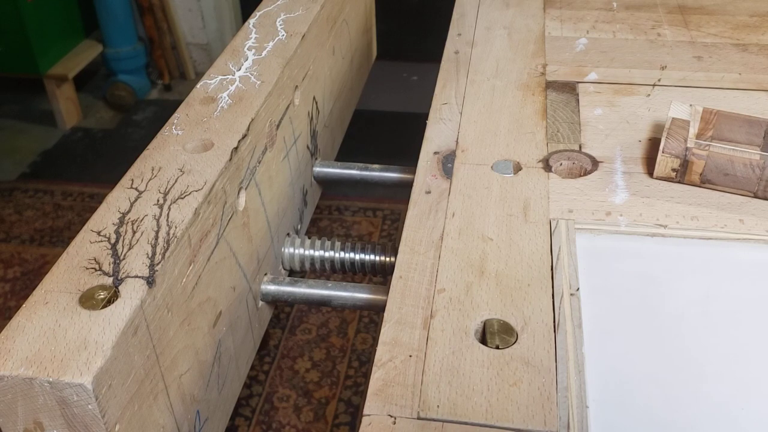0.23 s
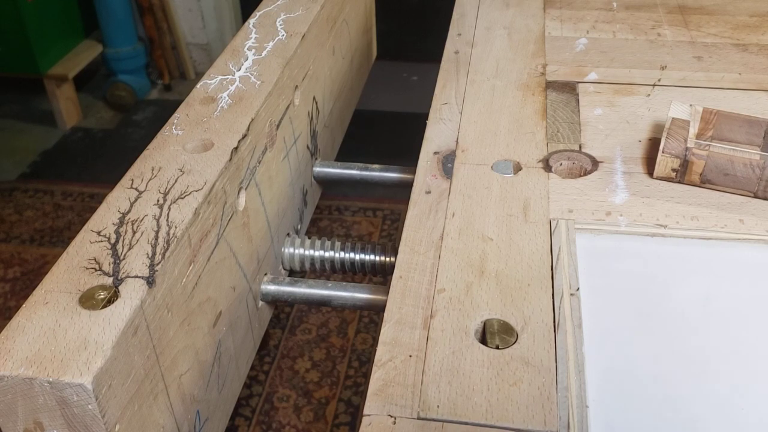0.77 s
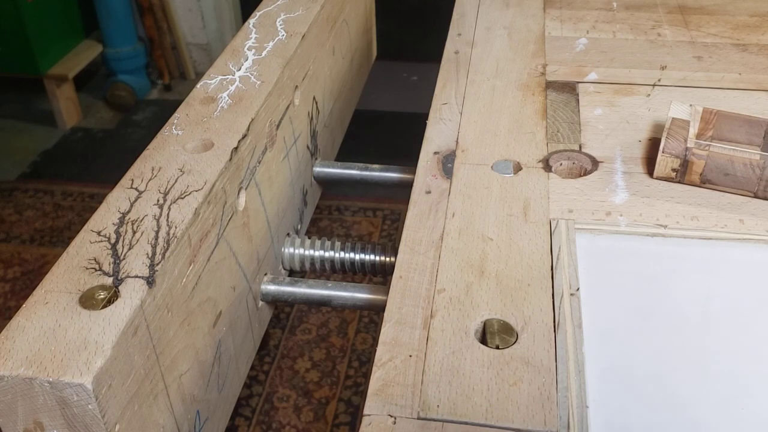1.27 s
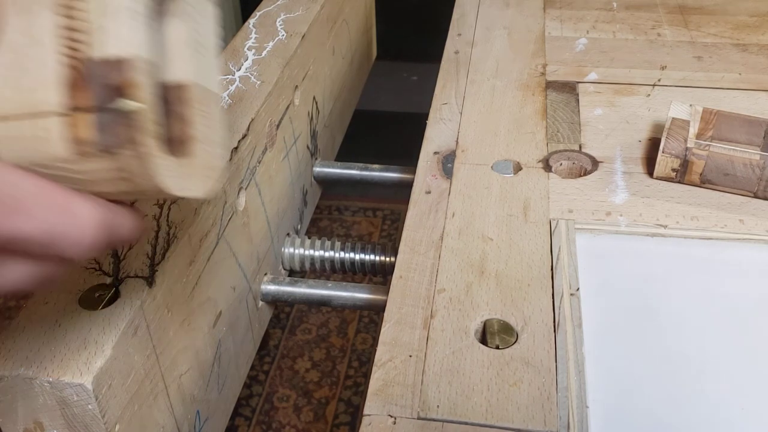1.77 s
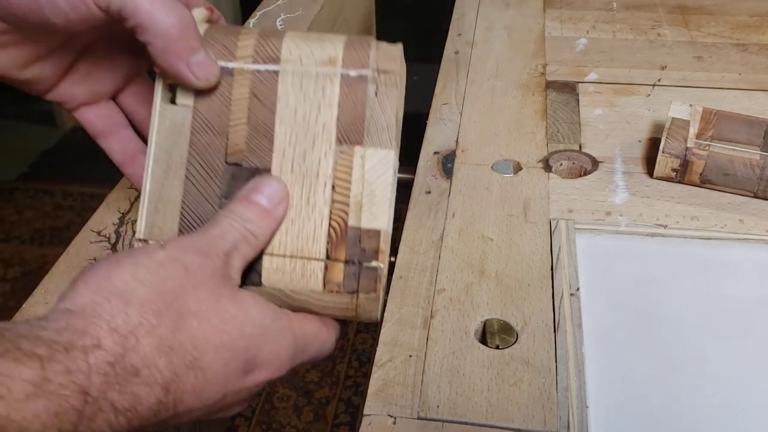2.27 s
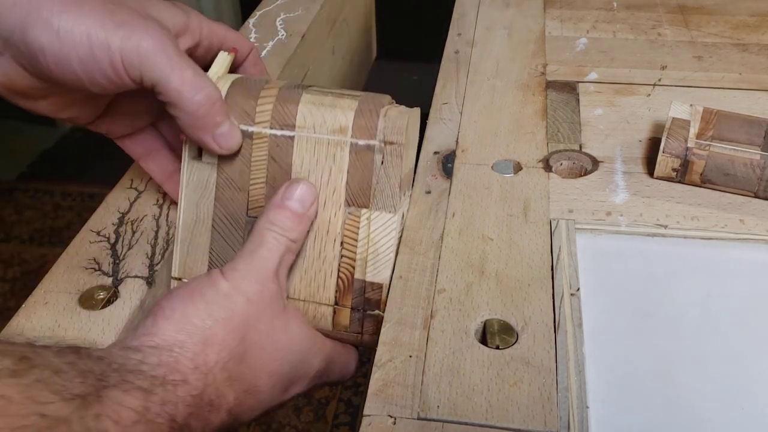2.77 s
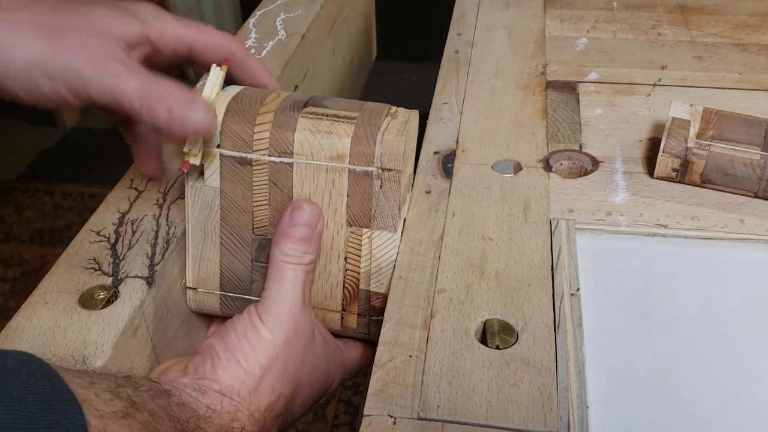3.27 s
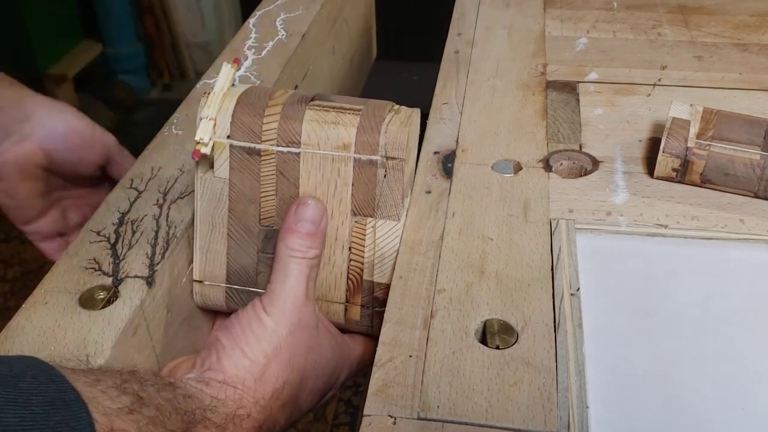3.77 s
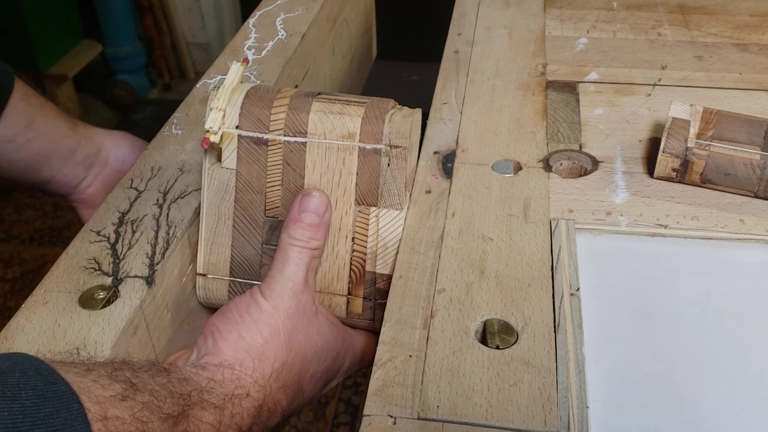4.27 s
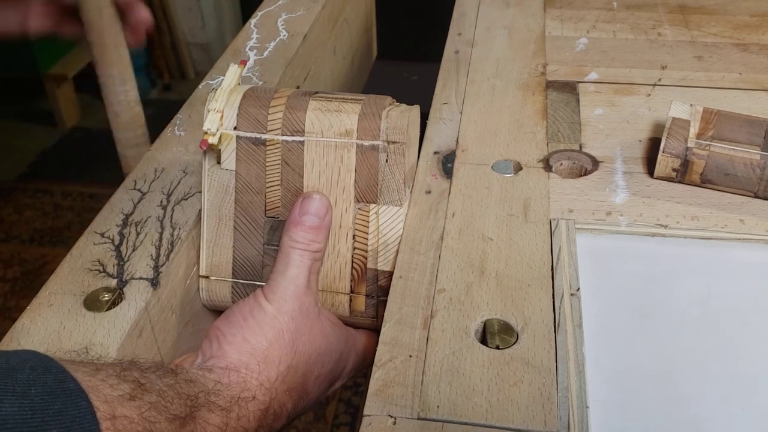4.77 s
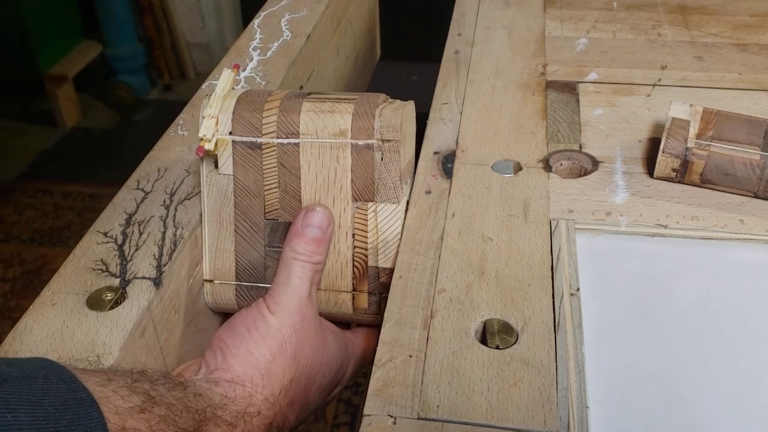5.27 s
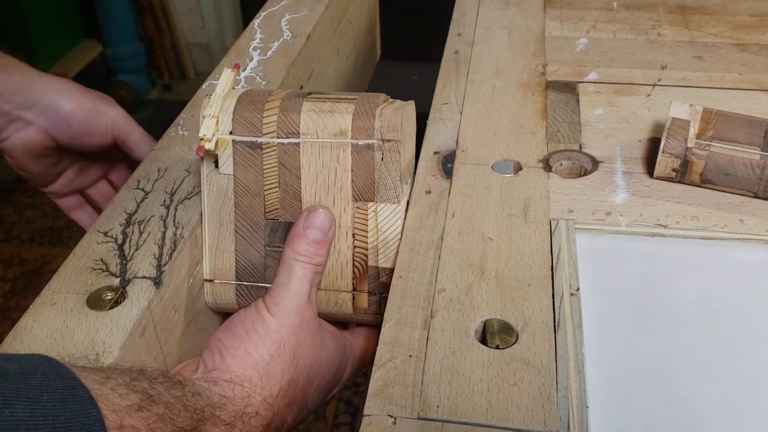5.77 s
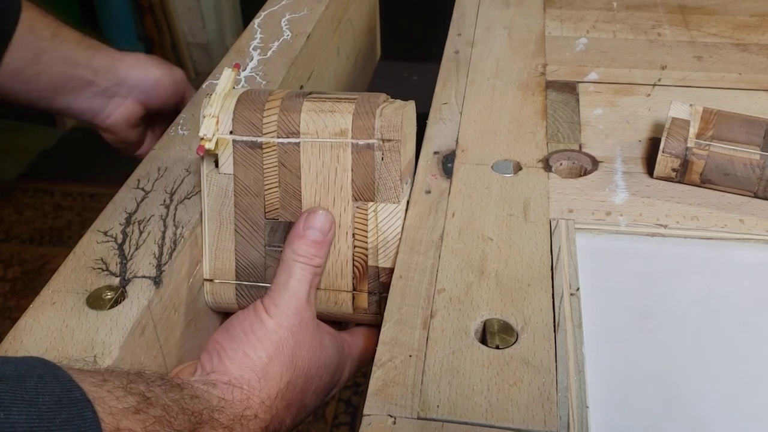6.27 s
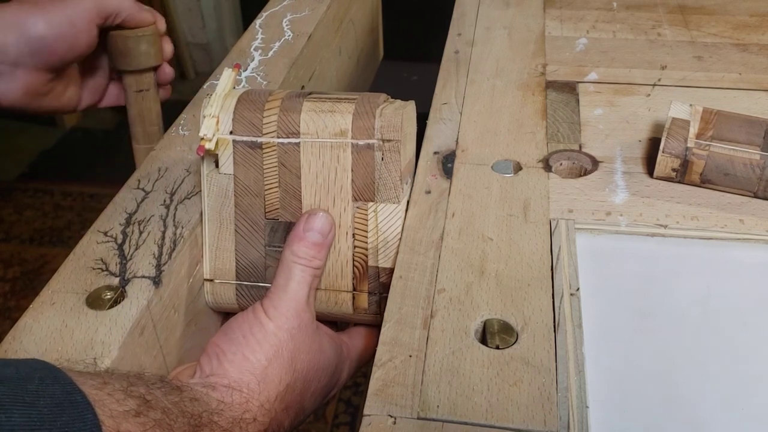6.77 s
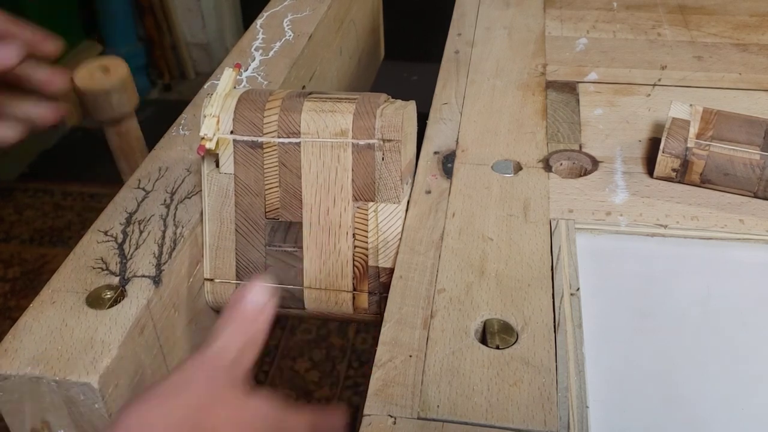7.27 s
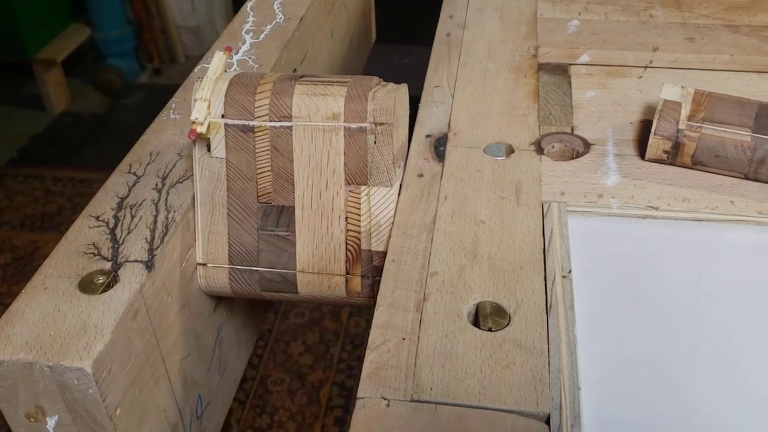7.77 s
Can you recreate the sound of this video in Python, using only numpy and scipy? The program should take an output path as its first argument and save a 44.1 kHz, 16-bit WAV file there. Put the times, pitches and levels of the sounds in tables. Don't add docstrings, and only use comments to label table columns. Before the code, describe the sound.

Quiet humming workshop: soft sliding wood, dull clustered knocks and rumbling grinding as a vice is wound shut, ending with its handle dropping sharply.

```python
import sys
import numpy as np
from scipy import signal
from scipy.fft import rfft, irfft
from scipy.io import wavfile
from scipy.ndimage import uniform_filter1d

SR = 44100
rng = np.random.default_rng(int(sys.argv[2]) if len(sys.argv) > 2 else 0)


def materialize(psi):
    bounded = np.clip(np.atleast_2d(psi).T, -1, 1)
    quanta = np.round(bounded * 32767).astype(np.int16)
    wavfile.write(sys.argv[1], SR, quanta)


def natural_amplitude(level_db):
    exponent = np.asarray(level_db, float) / 20
    return 10 ** exponent


N = 353682

# frequency in Hz, density in dB per Hz.
AIR_SPECTRUM = [(45, -8), (65, -3), (95, -11), (150, -13), (250, -13), (310, -20), (500, -32.5), (900, -35),
                (2000, -47), (5200, -53.5), (6800, -63), (8200, -66), (10000, -56.5), (14000, -49.5)]
AIR_DB = -48.5
# frequency in Hz, likeness from 0 to 1.
AIR_LIKENESS = [(60, 0.96), (180, 0.71), (550, 0.24), (1650, 0.025), (4970, 0.01), (15000, 0.18)]
# frequency in Hz, balance in dB.
AIR_BALANCE = [(60, -9.5), (180, 3.5), (550, -9.5), (1650, 0), (4970, -3.5), (15000, 0.5)]
# time in seconds, level in dB.
AIR_DRIFT = [(0, 3), (1.299, 3), (2, 0.5), (3.302, 0.5), (3.9, 4), (5, 1), (5.6, -2.5), (7.002, -3),
             (8.02, -5.5)]
# frequency in Hz, level in dB, waver in Hz, loose share from 0 to 1, #
# left-right balance in dB, left lead in radians.
HUM_TONES = [
    (119.5, -44.5, 14, 0.22, -1, 0.087),
    (76.2, -44, 4.7, 0.43, 1.5, 0.13),
    (251.6, -60, 2.5, 0.7, 5, 0.11),
    (63.3, -50.5, 3.8, 0.93, 0.5, 0.11),
]

# time in seconds, hold in seconds, edge in seconds, swish in dB, sheen in dB.
CLOTH_MOVES = [(-0.011, 0.039, 0.013, -53, -57), (0.094, 0.045, .15, -64.5, -77),
               (0.315, 0.031, 0.24, -63, -72.5), (0.531, 0.031, 0.12, -66.5, -69.5),
               (0.625, .002, 0.018, -48.5, -54), (0.656, 0.057, 0.039, -67, -75),
               (0.854, 0.0046, 0.089, -64, -91), (0.962, 0.0037, 0.081, -54.5, -70),
               (1.049, 0.087, 0.14, -63.5, -76), (1.238, 0.089, 0.055, -59.5, -68)]
# centre in Hz, width in Hz, level in dB.
CLOTH_SWISH = [(1930, 290, 4), (2800, 940, 4), (3700, 1400, 2.5), (4780, 850, -1), (6000, 710, -5)]
CLOTH_SHEEN = [(9400, 2300, -1.4), (12550, 3900, 0.047), (13300, 4300, -0.76)]
# start in seconds,
# length in seconds, level in dB, frequency in Hz, second frequency in Hz.
SCUFFS = [(0.286, 0.098, -73, 1360, 5400), (0.622, 0.02, -56.5, 2730, 4900),
          (0.61, 0.022, -58.5, 1880, 2300), (0.77, 0.16, -71.5, 1940, 2850), (.92, 0.096, -74, 4570, 4600),
          (0.936, 0.073, -64, 2500, 1950), (1.035, 0.077, -65, 1900, 1500), (1.05, .08, -67.5, 2790, 4300),
          (1.227, 0.045, -78, 4350, 5000), (1.295, 0.057, -67, 2850, 7300), (.002, 0.042, -73, 4150, 2460),
          (0.256, 0.15, -79, 5570, 6850), (0.498, .11, -80.5, 4950, 5400), (2.51, .12, -81, 5230, 4530),
          (3.22, 0.068, -79, 5400, 4200), (3.25, .07, -79, 6500, 3350), (6.335, 0.075, -63, 2705, 2480),
          (2.825, 0.13, -67.5, 1700, 2850), (3.284, 0.068, -65, 2320, 5170), (6.341, .1, -58, 1290, 4900),
          (7.049, 0.2, -80, 4600, 5420), (4.77, 0.15, -77, 6670, 5400), (2.448, .07, -73, 1380, 5130),
          (2.539, .06, -70.5, 1430, 5400), (2.655, 0.06, -67.5, 1400, 3400),
          (2.85, 0.088, -64.5, 2850, 4440), (6.255, 0.063, -63.5, 3830, 2570),
          (6.335, 0.085, -70, 4850, 3900),
          (6.705, 0.092, -57, 632, 860), (8.3, 0.065, -70.5, 1700, 1110), (7.363, .045, -66.5, 2400, 4500),
          (4.76, 0.21, -79, 4250, 4900), (8.5, 0.098, -78, 5240, 4100)]
# start in seconds, level in
# dB, centre in Hz, left-right in dB.
TICKS = [(0.622, -36.5, 13500, 8), (0.66, -36.5, 6540, 9), (1.134, -46, 10800, 5), (5.4548, -48, 7400, 21),
         (5.5756, -47, 11500, -18), (5.676, -46, 11800, -3), (7.453, -2.5, 5620, -6)]
# top in seconds, rise in seconds, hold in seconds, level in dB.
SLIDES = [(2.303, 0.07, .005, -64), (2.561, 0.15, 0.1, -51.5), (2.763, 0.016, .003, -45.5),
          (2.793, 0.018, 0.16, -54), (3.031, 0.062, 0.059, -58.5), (3.216, 0.1, 0.04, -60.5),
          (3.307, 0.046, 0.0064, -53.5)]
# centre in Hz, width in Hz, level in dB.
HOLLOW = [(1430, 160, 6), (1700, 120, -12), (2320, 380, 0), (2850, 190, 0.5), (3400, 140, 1),
          (4640, 670, 3), (5400, 56, -9.5), (10500, 2500, -9.5)]
# top in seconds, rise in seconds, hold in seconds, level in dB.
PALM_GLIDES = [(4.774, 0.16, 0.11, -61), (3.9, .04, .03, -75), (4.16, .01, 0.0092, -76),
               (6.13, .04, 0.022, -70), (6.203, 0.12, 0.21, -83), (7.103, 0.2, .005, -71.5),
               (7.22, 0.12, 0.0035, -75)]
# centre in Hz, width in Hz, level in dB.
SKIN = [(4690, 1100, -9), (6850, 610, -1), (9960, 1000, -0.5), (11500, 1500, -3.5), (13050, 2600, 8),
        (14840, 3000, 7.5)]
# frequency in Hz, gain in dB.
FRICTION_TREBLE = [(10000, -1), (12000, 5), (15000, 9)]

# frequency in Hz, level in dB, t60 in seconds.
BENCH = [(50.55, -3, .3), (78.7, -3.5, 0.25), (101.3, -5, .2), (136.3, -1.5, 0.19), (161.7, 0.5, 0.058),
         (212.2, -8, 0.1), (255.3, -2, 0.12), (281, -5, 0.17), (400, 15.5, 0.069), (477, -6.5, 0.17)]
HANDLE = [(520, -2, .09), (650, 0, .1), (731, -2, .08), (865, -1, .09), (960, -2, .07), (1077, -2, .07),
          (1210, -1, .07), (1430, 0, .07), (1663, -1, .06), (1900, -1, .06), (2137, -1, .06),
          (2400, -2, .05), (2700, -1, .05)]
KNOB = [(2950, -4, .03), (3300, -3, .03), (3570, -2, .03), (3844, -1, .035), (4100, -2, .03),
        (4330, 0, .03), (4619, 1, .03), (5087, 0, .03), (5500, -5, .03), (5900, -8, .025),
        (6400, -12, .025), (9500, -20, .01)]
# top in seconds, rise in seconds, hold in seconds, level in dB.
GRINDS = [(2.497, 0.093, .005, -54.5), (2.576, 0.18, 0.025, -53), (4.408, 0.098, 0.0068, -49.5),
          (4.615, 0.028, 0.12, -56.5), (5.041, 0.055, 0.046, -69.5), (6.079, 0.052, 0.027, -55),
          (6.122, 0.028, 0.15, -37.5), (6.246, 0.04, 0.095, -39.5), (6.387, .1, 0.018, -32),
          (6.732, 0.13, 0.066, -55), (7.045, 0.075, 0.05, -58), (7.195, 0.065, 0.088, -69.5),
          (7.373, 0.018, 0.005, -63.5), (7.397, 0.01, .012, -42.5), (7.423, .012, 0.021, -39)]
# top in seconds, hold in seconds, fall in seconds,
# rumble in dB, place on the bench in Hz.
SCREW_PULLS = [(2.493, 0.0024, 0.088, -35.5, 139), (2.56, 0.086, 0.14, -44.5, 157),
               (4.18, 0.017, 0.41, -35, 142), (4.33, 0.12, 0.091, -38, 179),
               (4.448, 0.0053, 0.069, -24, 247), (4.48, 0.022, 0.051, -35.5, 200),
               (4.597, 0.004, 0.03, -35, 176), (4.692, 0.0082, 0.1, -44.5, 195),
               (5.051, 0.076, 0.1, -52.5, 280), (5.327, 0.0033, 0.058, -33, 166),
               (6.157, 0.022, 0.23, -28.5, 93), (6.259, 0.044, 0.088, -27.5, 88.6),
               (6.359, 0.075, 0.17, -28.5, 86.6), (6.714, 0.044, 0.21, -44, 102),
               (7.0, 0.065, 0.057, -46, 125), (7.44, 0.01, 0.027, -43, 120)]
# frequency in Hz, level in dB.
SQUEAL_TONES = [(6525, 6), (8441, 0), (12737, -24)]
# top in seconds, hold in seconds, level in dB.
SQUEAL_CRIES = [(6.227, 0.13, -76.5), (6.494, 0.034, -75.5)]
# start in seconds, frequency in Hz, level in dB, t60 in seconds.
PINGS = [(4.152, 3450, -45, .05), (4.158, 1576, -40, 0.071), (4.158, 2255, -38, .05),
         (4.158, 377, -49, 0.06), (4.417, 1197, -38, 0.049), (4.442, 868, -32, 0.045),
         (4.455, 259.4, -34.5, .15), (4.558, 1120, -32.5, 0.032), (4.557, 4170, -58, 0.043),
         (5.302, 418, -43, 0.064), (5.302, 1263, -54, 0.076), (6.127, 1665, -43, .05),
         (6.208, 702, -35, 0.12), (6.208, 2500, -46, 0.057), (6.208, 3520, -48, .04),
         (6.228, 727, -36, 0.041), (6.408, 2800, -54, 0.026), (7.453, 3980, -16.5, 0.022),
         (7.47, 3700, -31, 0.06), (7.422, 1890, -48.5, .05), (6.213, 1286, -37.5, .06),
         (6.402, 4650, -56, .04), (7.453, 4640, -9, 0.0092), (7.531, 3920, -31.5, 0.032),
         (2.767, 3530, -52.5, 0.02)]
# start in seconds, level in dB.
TAP = (2.769, -36.5)
# frequency in Hz, level in dB, t60 in seconds.
BLOCK = [(1290, -7, 0.042), (1434, 2, 0.079), (1940, -1.5, 0.057), (2890, 0, 0.018), (4300, -8, 0.034)]
# start in seconds, level in dB, centre in Hz, rattle in milliseconds.
CRACKS = [(4.151, -41, 3840, 3.8), (4.161, -37.5, 4070, 9.3), (4.432, -54, 5000, 4.3),
          (4.44, -51.5, 3900, 11), (4.557, -52, 4000, 16), (6.126, -53, 4540, 12), (6.157, -50, 4600, 3.4),
          (6.207, -48, 3400, 8.3), (6.231, -57, 3400, 5), (6.252, -57, 4030, 3.4), (6.298, -53, 3000, 4.5),
          (6.333, -50, 3800, 3.3), (6.411, -63, 4600, 5), (7.391, -56, 4500, 10.6), (7.417, -50, 3570, 11),
          (7.437, -52.5, 4370, 4.4)]
# start in seconds, thud in dB, knock in dB, knock centre in Hz,
# dullness in dB per octave squared.
KNOCKS = [(4.152, -44, -36, 1960, 3), (4.161, -38.5, -34, 1460, -4), (4.416, -42, -36, 900, 7),
          (4.428, -32, -26, 700, 12), (4.44, -34, -22.5, 830, 3), (4.557, -42, -29.5, 1090, 4.5),
          (5.299, -34.5, -36, 995, 8.5), (5.325, -44, -46, 900, 10), (6.126, -37.5, -45, 1450, -5),
          (6.207, -32.5, -22.5, 900, 7), (6.228, -57, -30, 750, 7), (6.333, -48, -34, 1290, 9),
          (6.408, -47, -39, 1400, 14), (7.391, -49, -35, 691, 2.5), (7.418, -37.5, -27.5, 700.5, 7.5),
          (7.652, -37, -56, 608, -1)]
# start in seconds, level in dB, top in Hz, t60 in seconds.
SHUDDERS = [(4.152, -47, 6000, 0.26), (4.438, -43.5, 3070, 0.18), (4.44, -50.5, 5500, 0.27),
            (4.557, -47, 2900, 0.22), (5.299, -52.5, 2560, 0.21), (6.207, -42, 3760, 0.21),
            (7.454, -19, 6010, 0.095), (7.531, -35, 5840, 0.22)]
# start in seconds, wood in dB, dullness in dB per octave squared,
# crack in dB.
DROPS = [
    (7.4542, -6, -0.86, -2),
    (7.531, -19, -2, -28),
]
# frequency in Hz, level in dB, t60 in seconds.
STOP = [(51.6, -21.5, 0.14), (127, -13.5, 0.2), (255.3, -12, 0.19), (379, 1, 0.083), (517, -11.5, 0.076),
        (647.5, -5, 0.22), (732, -16.5, 0.16), (918, -16.5, 0.076), (960, -14.5, 0.077), (1044, -18, 0.071),
        (1460, -9.5, 0.043), (1620, -9.5, 0.033), (2000, -29, 0.13), (2130, 1, 0.032), (2500, -26, 0.04)]
# frequency in Hz, level in dB, t60 in seconds,
# free time in seconds.
BOUNCE_RING = [(379.7, -21, 0.45, 0.04), (186, -31.5, 0.17, 0.046), (300, -37.5, 0.12, .03),
               (77, -35, 0.24, 0.099), (2130, -28, 0.15, 0.048), (697, -31.5, 0.15, 0.05)]

# frequency in Hz, t60 in seconds.
ROOM_T60 = [(100, 0.66), (350, 0.34), (1400, 0.15), (3000, 0.18), (6000, 0.2), (12000, 0.22)]
# frequency in Hz, gain in dB.
MIC = [(30, 4.5), (100, 8.5), (2000, -1.5), (2850, -0.5), (3700, 2), (5000, 2), (6400, 1.5), (7400, -2.5),
       (8600, 0), (10000, 6), (16000, -16)]
# frequency in Hz, balance in dB.
PORTS = [(60, 15.5), (150, -5), (380, 5), (950, -7), (2380, -3), (5980, -5.5), (15000, 14.5)]
AIR_EDGE_HZ = 15780


def evened(x):
    return x / np.sqrt(np.mean(x ** 2) + 1e-20)


def read(points, hz):
    f, value = np.transpose(points)
    return np.interp(np.log(hz + 1), np.log(f + 1), value)


def lean(pan_db):
    return natural_amplitude(np.array([[pan_db / 2], [-pan_db / 2]]))


def add(mix, start_s, sound, pan_db):
    part = mix[:, round(start_s * SR):][:, :len(sound)]
    part += sound[:part.shape[1]] * lean(pan_db)


def resonate(x, hz, width_hz):
    return signal.lfilter(*signal.iirpeak(hz, hz / width_hz, SR), x)


def wander(hz):
    noise = rng.standard_normal(N // 40)
    return evened(signal.lfilter([1], [1, -np.exp(-2 * np.pi * hz / 1000)], noise))


def stroke(top_s, rise_s, hold_s, fall_s, db):
    times = np.array([top_s - rise_s, top_s, top_s + hold_s, top_s + hold_s + fall_s])
    return np.maximum(times, 0), db - 25 * np.array([1, 0, 0, 1])


def rub(s, db, colour, per_s, spread_db):
    t = np.arange(s[0], s[-1], 1 / SR)[:SR // 2]
    force = rng.standard_normal(len(t))
    chance = rng.random(len(t)) * SR / per_s
    rarity = np.clip(-np.log(chance + 1e-12), 0, 4)
    slips = force * (chance < 1) * natural_amplitude(spread_db * rarity)
    tone = 0
    for hz, width, gain_db in colour:
        twice = resonate(resonate(slips, hz, 2 * width), hz, 2 * width)
        tone = tone + natural_amplitude(gain_db) * twice / np.sqrt(width)
    return natural_amplitude(np.interp(t, s, db)) * evened(tone) * signal.windows.tukey(len(t), 0.04)


def near_to(modes, centre_hz, octave_db):
    return [(f, g - octave_db * np.log2(f / centre_hz) ** 2, t60) for f, g, t60 in modes]


def crowd(modes, spread, weaker_db, count=3):
    scatter = rng.uniform(-0.99, 1, (len(modes), count))
    neighbours = [(f * (1 + spread * u), g - weaker_db, 0.5 * t60)
                  for (f, g, t60), row in zip(modes, scatter) for u in row]
    return modes + neighbours


def ring(modes, detune, damping=0.89, soft=0.19):
    hz, db, t60 = np.transpose(modes)
    t = np.arange(min(SR // 6, int(2 * SR * t60.max() / damping)))[:, None] / SR
    hz = hz * (1 + detune * rng.uniform(-0.87, 1, len(hz)))
    decay = natural_amplitude(db - 60 * damping * t / t60)
    tones = decay * np.sin(2 * np.pi * hz * t) * rng.choice([-1, 1], len(hz))
    sound = (tones * (1 - np.exp(-t * hz / soft))).sum(1)
    sound = sound * np.hanning(2 * len(t))[len(t):]
    return sound / abs(sound).max()


def chatter(sound, ms):
    t_ms = np.arange(2048) / SR * 1000
    shape = np.exp(-t_ms / ms) * (1 - np.exp(-9 * t_ms / ms))
    rattle = rng.standard_normal(len(t_ms))
    for _ in range(4):
        power = abs(uniform_filter1d(rattle ** 2, size=64))
        spectrum = rfft(shape * rattle / np.sqrt(power + 1e-30))
        rattle = irfft(spectrum / abs(spectrum))
    sound = signal.oaconvolve(sound, rattle * (t_ms < 8 * ms))
    return sound / abs(sound).max()


def air():
    frames, hz = N // 512 + 5, np.fft.rfftfreq(2048, 1 / SR)
    a, b, c, d, patches = rng.standard_normal((frames, 1025, 5)).T
    patches = evened(uniform_filter1d(uniform_filter1d(patches, 20, 0), 10, 1))
    same = read(AIR_LIKENESS, hz)[:, None]
    left = a + 1j * b
    right = same * left + np.sqrt(1 - same ** 2) * (c + 1j * d)
    s, drift_db = np.transpose(AIR_DRIFT)
    drift_db = np.interp(np.arange(frames) * 512 / SR, s, drift_db - drift_db.mean())
    middle = np.exp(-(np.log2(hz / 1000 + 1e-9) / 1.6) ** 2)[:, None]
    level_db = read(AIR_SPECTRUM, hz)[:, None] + 0.79 * patches + middle * drift_db
    z = np.array([left, right]) * natural_amplitude(level_db) * (hz < AIR_EDGE_HZ)[:, None]
    z *= natural_amplitude(np.array([0.5, -0.5])[:, None, None] * read(AIR_BALANCE, hz)[:, None])
    return natural_amplitude(AIR_DB) * evened(signal.istft(z, nperseg=2048, noverlap=1536)[1][:, :N])


def hum():
    out, t, wander_s = np.zeros((2, N)), np.arange(N) / SR, np.arange(N // 40) / 1000
    for hz, db, waver_hz, loose, pan_db, lead_rad in HUM_TONES:
        swell = np.interp(t, wander_s, wander(waver_hz) + 1j * wander(waver_hz)) / np.sqrt(2)
        swing = (1 - loose) + loose * swell
        tone = swing * np.exp(2j * np.pi * hz * t) * np.exp(1j * np.array([[lead_rad], [0]]))
        out += natural_amplitude(db) * evened(tone.real) * lean(pan_db)
    return out


def cloth():
    out = np.zeros((2, N))
    for top_s, hold_s, edge_s, swish_db, sheen_db in CLOTH_MOVES:
        s, db = stroke(top_s, edge_s, hold_s, edge_s, 0)
        add(out, s[0], rub(s, db + swish_db - 9, CLOTH_SWISH, 3800, 0.9), 0.2)
        add(out, s[0], rub(s, db + sheen_db - 5, CLOTH_SHEEN, 4600, 1.2), 0.2)
    return out


def scuffs():
    out = np.zeros((2, N))
    for start_s, length_s, db, hz, second_hz in SCUFFS:
        s = [start_s, start_s + length_s / 3, start_s + length_s]
        colour = [(hz, 0.05 * hz, 0), (second_hz, 0.018 * second_hz, -9)]
        add(out, start_s, rub(s, [db - 0.5, db, db - 4.5], colour, 3000, 4.9), 0.4)
    return out


def ticks():
    out, t = np.zeros((2, N)), np.arange(800) / SR
    for start_s, db, hz, pan_db in TICKS:
        snap = rng.standard_normal(len(t)) * natural_amplitude(-60 * t / 0.02)
        snap = np.diff(snap, prepend=0) * 0.35 + resonate(snap, hz, 2500)
        add(out, start_s, natural_amplitude(db - 12) * snap / abs(snap).max(), pan_db)
    return out


def block_slide():
    out = np.zeros((2, N))
    for top_s, rise_s, hold_s, db in SLIDES:
        s, db = stroke(top_s, rise_s, hold_s, 0.12, db)
        add(out, s[0], rub(s, db - 13, HOLLOW, 3300, 3.7), 1.5)
    return out


def thread_grind():
    out = np.zeros((2, N))
    wood = near_to([(392, -0.25, 0)] + BENCH[9:] + HANDLE[:9], 700, 0.69)
    grind_colour = [(f, 0.06 * f, g) for f, g, _ in wood]
    grit_colour = [(f, 320, g) for f, g, _ in HANDLE[9:] + KNOB[:11]]
    for top_s, rise_s, hold_s, db in GRINDS:
        s, db = stroke(top_s, rise_s, hold_s, 0.058, db)
        grit_db = -59.5 + 0.73 * (db + 36)
        add(out, s[0], rub(s, db - 9.5, grind_colour, 3200, 3.6), 2.5)
        add(out, s[0], rub(s, grit_db - 4, grit_colour, 2000, 2.45), 2.5)
    return out


def screw_rumble():
    out = np.zeros((2, N))
    for top_s, hold_s, fall_s, db, centre_hz in SCREW_PULLS:
        s, db = stroke(top_s, 0.08, hold_s, fall_s, db)
        colour = [(f, 14, g) for f, g, _ in near_to(BENCH[:8], centre_hz, 10.4)]
        add(out, s[0], rub(s, db - 10, colour, 600, 2.8), 5)
    return out


def pings():
    out = np.zeros((2, N))
    for start_s, hz, db, t60_s in PINGS:
        add(out, start_s, natural_amplitude(db) * chatter(ring([(hz, 0, t60_s)], 0, 1, 3.8), 0.89), 1.5)
    return out


def block_tap():
    out = np.zeros((2, N))
    start_s, db = TAP
    add(out, start_s, natural_amplitude(db) * chatter(ring(BLOCK, 0.002, 2, 0.92), 1.8), 0.3)
    return out


def palm():
    out = np.zeros((2, N))
    for top_s, rise_s, hold_s, db in PALM_GLIDES:
        s, db = stroke(top_s, rise_s, hold_s, 0.11, db)
        add(out, s[0], rub(s, db - 5, SKIN, 15000, 0.63), 3)
    return out


def knob_cracks():
    out = np.zeros((2, N))
    for start_s, db, hz, rattle_ms in CRACKS:
        modes = crowd(near_to(KNOB, hz, 9), 0.021, 2.6, count=5)
        add(out, start_s, natural_amplitude(db) * chatter(ring(modes, 0.073, 2.2, 0.19), rattle_ms), 2.5)
    return out


def knocks():
    out = np.zeros((2, N))
    for start_s, thud_db, knock_db, knock_hz, dull_db in KNOCKS:
        thud_hz = min(0.3 * knock_hz, 390)
        thud = ring(near_to(BENCH, thud_hz, 29), 0.0071, 1.5, 0.28)
        add(out, start_s, natural_amplitude(thud_db) * chatter(thud, 5.9), 2.5)
        modes = crowd(near_to(HANDLE, knock_hz, dull_db), 0.12, 2.4, count=5)
        add(out, start_s, natural_amplitude(knock_db) * chatter(ring(modes, 0.028, 2.6, 0.5), 6.5), 1.5)
    return out


def bench_shudder():
    out, t = np.zeros((2, N)), np.arange(SR // 4) / SR
    for start_s, db, top_hz, t60_s in SHUDDERS:
        both, apart = rng.standard_normal((2, len(t)))
        band = np.vstack([signal.butter(14, top_hz, fs=SR, output="sos"),
                          signal.butter(1, 900, fs=SR, output="sos"),
                          signal.butter(2, 350, "high", fs=SR, output="sos")])
        shape = natural_amplitude(db - 60 * t / t60_s) * (1 - np.exp(-t / 0.0038))
        add(out, start_s, shape * evened(signal.sosfilt(band, both)), 1.5)
        add(out, start_s, 0.38 * shape * evened(signal.sosfilt(band, apart)), -14)
    return out


def thread_squeal():
    out = np.zeros((2, N))
    for top_s, hold_s, db in SQUEAL_CRIES:
        s, db = stroke(top_s, 0.06, hold_s, 0.06, db)
        add(out, s[0], rub(s, db + 6, [(f, 55, g) for f, g in SQUEAL_TONES], 500, 3.1), 2.5)
    return out


def handle_drop():
    out = np.zeros((2, N))
    for start_s, wood_db, dull_db, crack_db in DROPS:
        wood = crowd(near_to(STOP, 466, dull_db), 0.19, 10.5 + 1.9 * dull_db, count=6)
        add(out, start_s, natural_amplitude(wood_db) * ring(wood, 0.0019154), 0.3)
        hard = crowd(HANDLE[11:] + KNOB, 0.035, 1.6, count=6)
        add(out, start_s, natural_amplitude(crack_db) * chatter(ring(hard, 0.02, 4.5), 0.46), 0.3)
    return out


def bounce_ring():
    out = np.zeros((2, N))
    for hz, db, t60_s, free_s in BOUNCE_RING:
        t = np.arange(0, free_s, 1 / SR)
        edges = (1 - np.exp(-t / 0.0037)) * np.minimum((free_s - t) / 0.018, 1)
        add(out, DROPS[1][0], natural_amplitude(db - 60 * t / t60_s) * np.sin(2 * np.pi * hz * t) * edges, 0.3)
    return out


def friction_treble(x):
    hz = np.linspace(0, SR / 2, 129)
    gain = natural_amplitude(read(FRICTION_TREBLE, hz)) * (hz < AIR_EDGE_HZ)
    return signal.oaconvolve(x, signal.firwin2(255, hz, gain, fs=SR)[None], "same", axes=1)


def room(x):
    taps, slots = np.zeros((2, SR // 2)), np.arange(140, 22000, 20)
    at = slots + rng.integers(0, 20, (2, len(slots)))
    np.put_along_axis(taps, at, rng.choice([-1., 1.], at.shape), 1)
    hz, t, z = signal.stft(taps, SR, nperseg=256)
    hz = hz[:, None]
    bass_db = -6 * np.exp(-(hz / 627) ** 2)
    tail = signal.istft(z * natural_amplitude(-60 * t / read(ROOM_T60, hz) + bass_db), SR, nperseg=256)[1]
    return signal.fftconvolve(x, tail / np.linalg.norm(tail[0]), axes=1)[:, :N]


def microphone(x):
    hz = np.linspace(0, SR / 2, 257)
    side = np.array([[1], [-1]])
    gains = natural_amplitude(2 * read(MIC, hz) + 1.32 * side * read(PORTS, hz))
    colour = np.array([signal.minimum_phase(signal.firwin2(511, hz, g, fs=SR)) for g in gains])
    return signal.oaconvolve(x, colour, axes=1)[:, :N]


def scene():
    near = friction_treble(cloth() + block_slide() + palm())
    near += scuffs() + ticks() + thread_grind() + screw_rumble() + thread_squeal()
    near += pings() + block_tap() + knob_cracks() + knocks() + handle_drop() + bounce_ring()
    right = 0.46 * np.roll(near[1], 8) + 0.33 * near[1]
    direct = np.array([near[0], right])
    return microphone(direct + bench_shudder() + natural_amplitude(-4) * room(near)) + air() + hum()


def roll_off(x):
    return signal.sosfilt(signal.butter(12, 16900, fs=SR, output="sos"), x)


def record(dry):
    ceiling = 1.05
    mix = ceiling * np.tanh(dry / ceiling) * np.minimum(np.arange(N) / 400, 1)
    mix = signal.oaconvolve(mix, signal.firwin(255, 16500, fs=SR)[None], "same", axes=1)
    mix = signal.sosfilt(signal.butter(4, 44, "high", fs=SR, output="sos"), mix)
    return roll_off(mix)


dry = scene()
out = record(dry)
materialize(out)
```